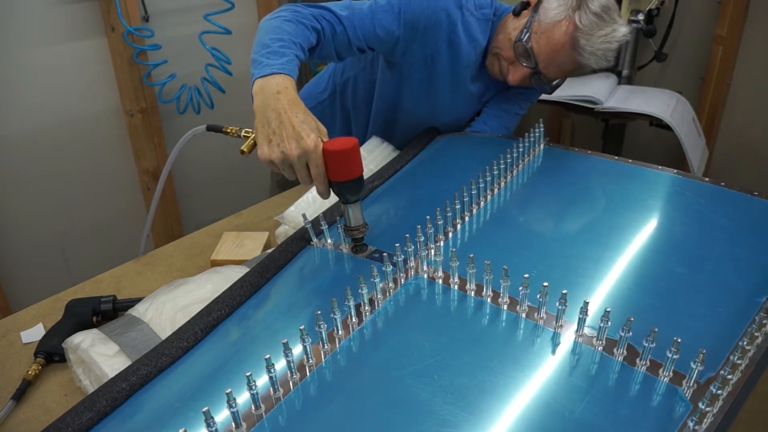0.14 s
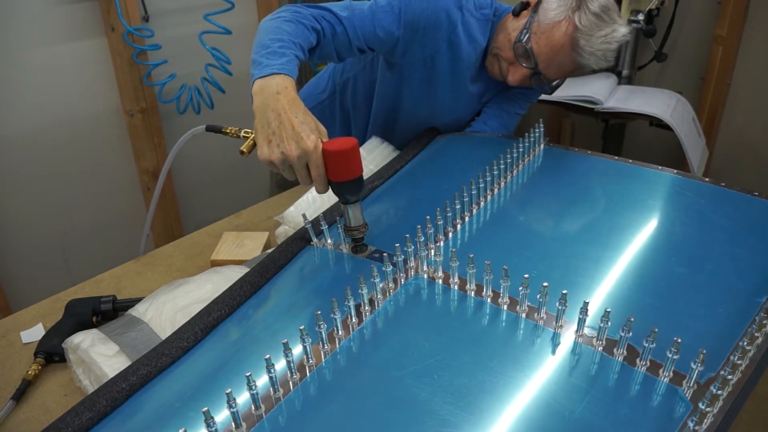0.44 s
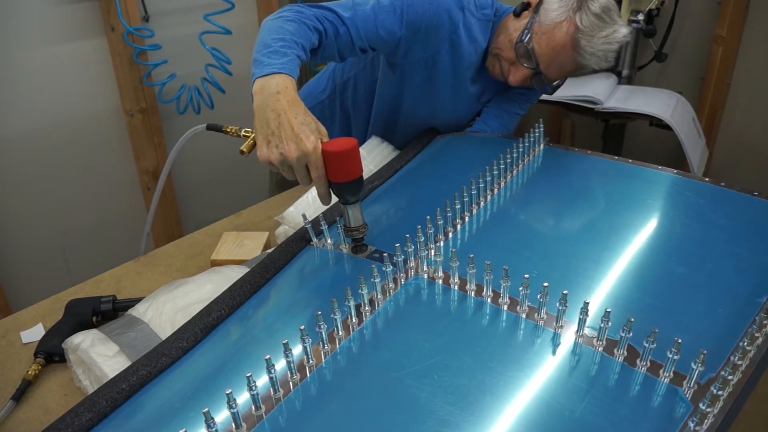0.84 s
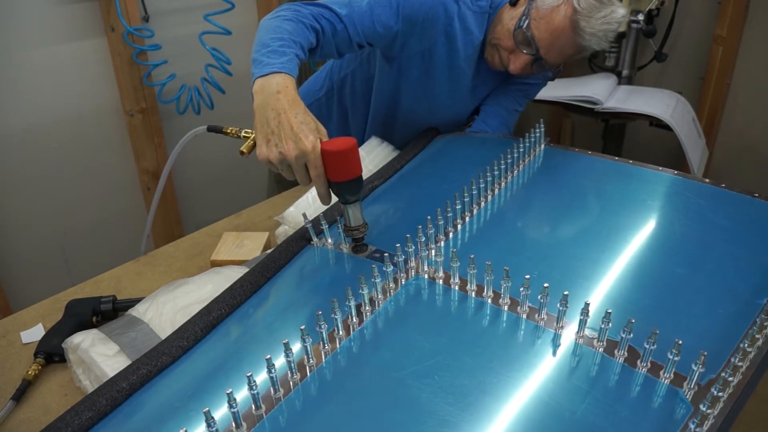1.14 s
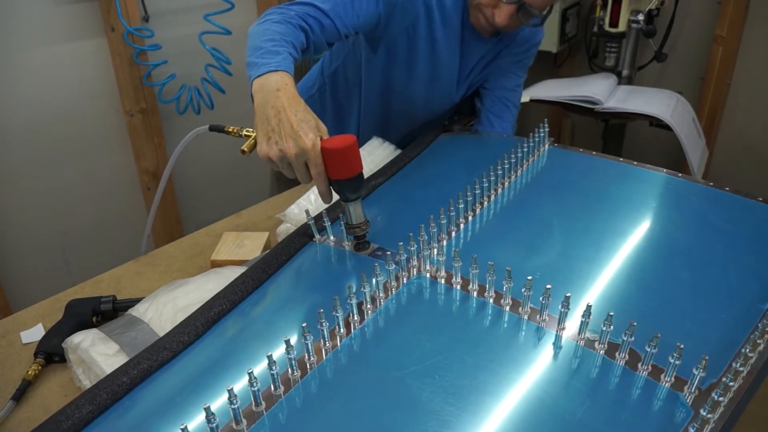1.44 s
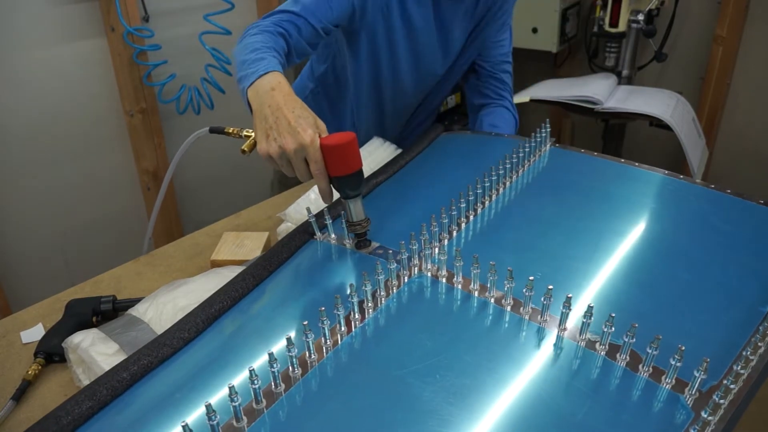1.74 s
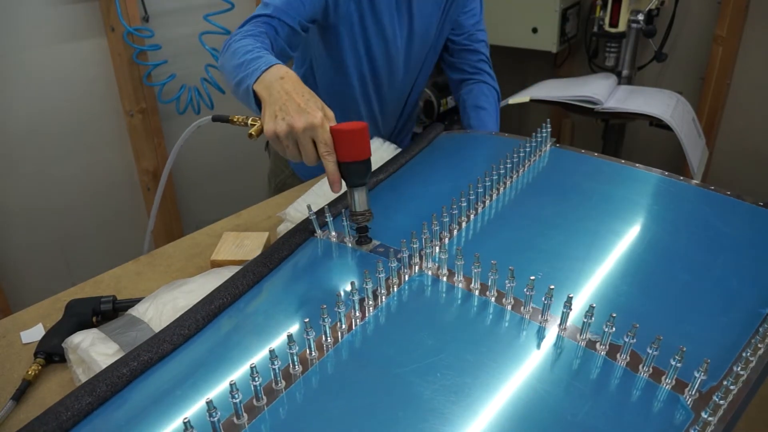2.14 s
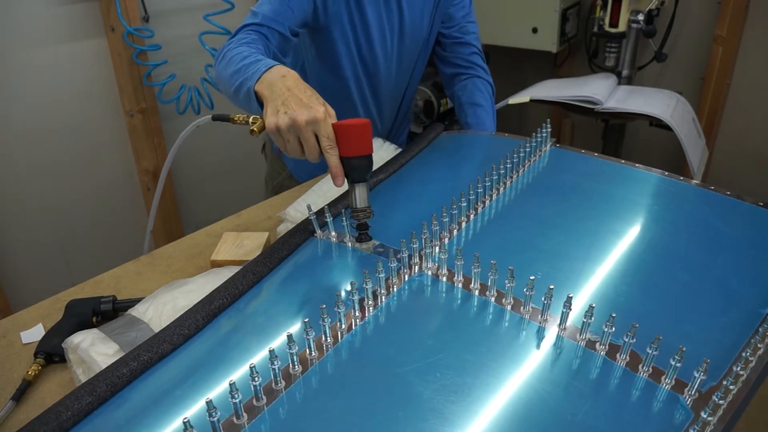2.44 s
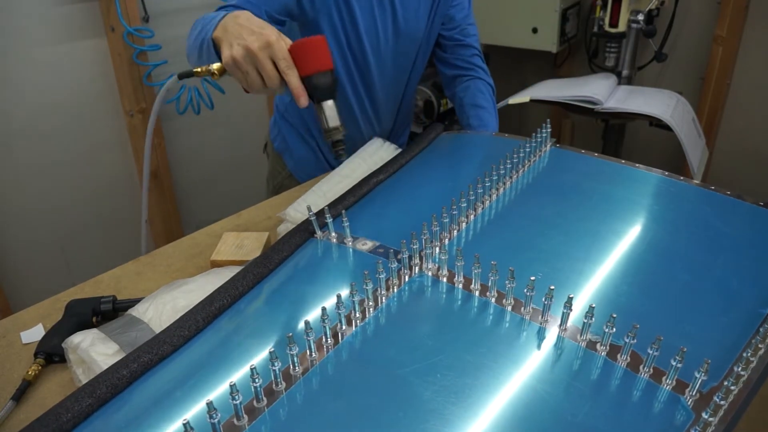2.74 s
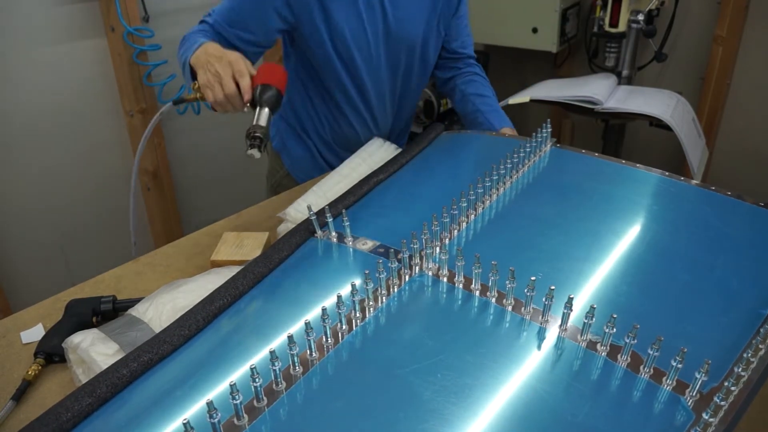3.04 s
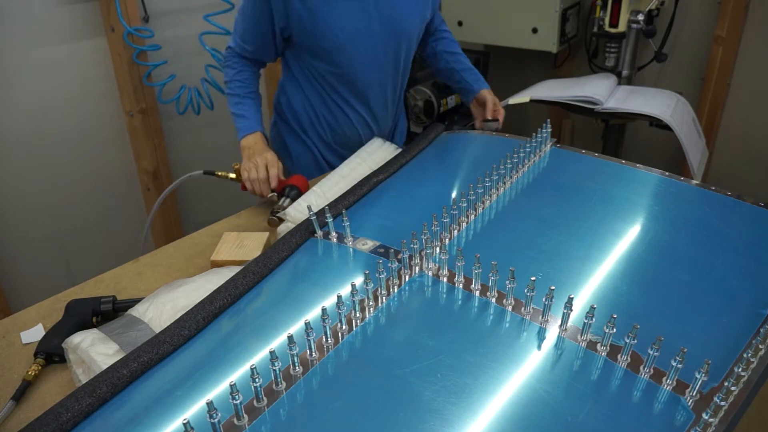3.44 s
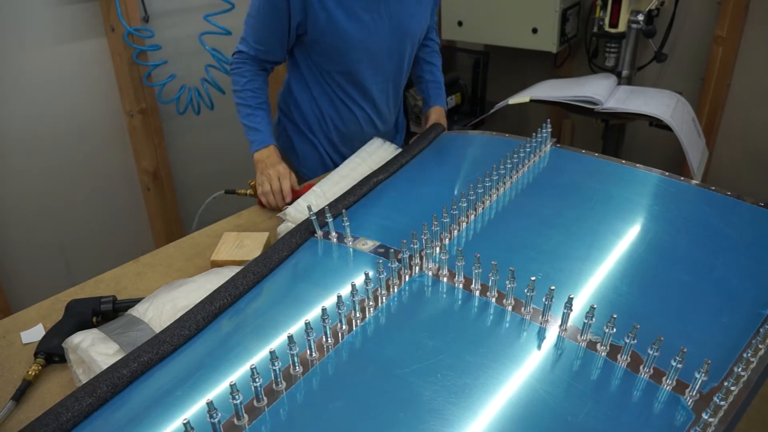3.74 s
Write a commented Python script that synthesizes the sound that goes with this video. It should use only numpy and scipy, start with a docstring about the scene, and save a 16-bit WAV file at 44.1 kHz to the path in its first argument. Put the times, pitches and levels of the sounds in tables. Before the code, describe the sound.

A pneumatic rivet gun dominates: over steady fan-like workshop rush, metal clicks at 0.4 s lead into a harsh, rattling burst on aluminium sheet from 0.5 to 0.75 s, about 38 blows per second, ringing briefly. The rush ducks, then creeps back. Cloth shuffles from 1.3 s; thin hiss around 2.2; clicks, thuds and air puffs at 2.4-2.6; bench knocks at 3.5 and 3.75-3.8.

```python
"""A steady room rush is heard first, then clicks and one hard burst of a pneumatic rivet gun on an aluminium panel.
A short, lighter clatter of clicks, knocks and thuds follows; afterwards the gun is knocked down on the bench.
Blows excite the panel's decaying modes, contacts are short coloured noise bursts, and valve air is shaped noise.
Soft shuffles swell and fade between. A gain control flattens the bursts and ducks the rush, which creeps back."""
import sys
import numpy as np
from scipy import signal
from scipy.fft import rfft, irfft
from scipy.io import wavfile
from scipy.ndimage import uniform_filter1d

SR = 44100
rng = np.random.default_rng(int(sys.argv[2]) if len(sys.argv) > 2 else 0)


def to_wav(sig):
    """Store sig (one row per channel, or 1-D mono) as 16-bit WAV at the path in sys.argv[1].

    Samples outside -1..1 are clipped; the rate is SR.
    """
    pcm = np.clip(np.atleast_2d(sig), -1, 1) * 32767
    pcm = np.round(pcm).astype(np.int16)
    wavfile.write(sys.argv[1], SR, pcm.T)  # frames by channels


N = 171990
TIME = np.arange(N) / SR  # the whole scene [s]
RING = np.arange(SR) / SR  # one second for each single event [s]


def amp(db):
    """Level law: decibels to an amplitude ratio."""
    return 10 ** (np.asarray(db) / 20)


def read(points, hz):
    """Interpolates a table linearly on a log-frequency axis, as pitch is heard."""
    f, value = np.transpose(points)
    return np.interp(np.log(hz + 1), np.log(f + 1), value)


def freqs(size):
    """The discrete Fourier frequencies [Hz] of a signal of this length."""
    return np.fft.rfftfreq(size, 1 / SR)


def add(mix, s, sound):
    """Superposition: adds a sound to the mix at time s."""
    start = max(round(s * SR), 0)
    part = mix[:, start:][:, :sound.shape[1]]
    part += sound[:, :part.shape[1]]


def noise(gain, size):
    """Filtered Gaussian noise, a mid and a side signal, each of unit RMS over the pair."""
    z = irfft(rfft(rng.standard_normal((2, size))) * gain, size)
    return z / np.sqrt(np.mean(z ** 2) + 1e-20)


def coloured(x, gain):
    """Minimum-phase filtering: a folded cepstrum gives a causal filter of unit power gain."""
    unit_gain = gain / np.sqrt(np.mean(gain ** 2))
    cepstrum = irfft(np.log(unit_gain + 1e-5), SR)
    cepstrum[1:SR // 2] *= 2
    cepstrum[SR // 2 + 1:] = 0
    return irfft(rfft(x) * np.exp(rfft(cepstrum)), SR)


def die_away(x, t60s):
    """Frequency-dependent damping: overlapping bands each decay by 60 dB in their own time."""
    hz, centres = freqs(SR), np.transpose(t60s)[0]
    spectrum = rfft(x)
    total = 0
    for share, (_, t60) in zip(np.eye(len(t60s)), t60s):
        band = irfft(spectrum * read(list(zip(centres, share)), hz), SR)
        total = total + band * np.exp(-np.log(1000) * RING / t60)
    return total


def hump(centre_hz, octaves):
    """A broad resonance, symmetrical on a log-frequency axis."""
    detuning = np.log2((freqs(SR) + 1) / centre_hz) / octaves
    return 1 / (1 + detuning ** 2 / 2) ** 2


def hit(gain, decay_s, room_db, snap=0):
    """Impact excitation: a decaying noise burst, an optional impulse and the workshop's reverberation."""
    # Reverberation: (frequency [Hz], 60 dB decay time [s])
    room_t60 = [(100, 0.13), (500, 0.46), (2500, .45), (6000, 0.35), (11000, 0.27)]
    burst = noise(1, SR) * np.exp(-RING / decay_s) + snap * (RING == 0)
    reverberation = amp(room_db) * die_away(noise(1, SR), room_t60)
    return coloured(burst + reverberation, gain)


def stereo(pair, side):
    """Mid-side decoding: sum and difference give left and right, with a balance set by frequency."""
    # Balance: (frequency [Hz], left minus right [dB])
    lean_points = [(60, 1), (110, -0.5), (190, -0.5), (350, 0), (630, 0.5), (1130, 3), (2020, 2.5),
                   (3640, 0.5), (6540, -0.5), (11800, 0.5)]
    hz = freqs(N)
    mid, wide = rfft(pair)
    wide = wide * amp(read(side, hz))
    lean = amp(read(lean_points, hz) / 2)
    return irfft(np.array([(mid + wide) * lean, (mid - wide) / lean]), N)


def room_rush():
    """Stationary broadband noise, as of a fan, with slow spectral flicker and narrow-band hum tones."""
    # Spectrum of the rush: (frequency [Hz], relative density [dB per Hz])
    rush_spectrum = [(15, -72), (25, -40), (54, -29), (96, -12.5), (152, -17), (182, -10), (281, -24.5),
                     (344, -4.5), (412, -6.5), (480, -1), (588, -4.5), (819, -6.5), (1000, -7.5),
                     (1230, -5), (1430, -11.5), (1630, -9.5), (2330, -13.5), (4400, -23.5), (11000, -42.5),
                     (14300, -86), (22000, -120)]
    # Wavering hum tones: (frequency [Hz], level [dB])
    hum_tones = [(101, -64), (182, -57.5), (479, -41.5), (684, -55.5), (802, -46.5), (861, -47.5),
                 (931, -48.5), (1206, -51.5)]
    rush_db, patchy_db, hum_width_hz = -33.5, 1.63, 12.3  # patchiness is a standard deviation
    hz = freqs(N)
    steady = noise(amp(read(rush_spectrum, hz)), N)
    z = signal.stft(steady, nperseg=1024, noverlap=768)[2]
    # Random gains smoothed over frequency, then over time
    patches = rng.standard_normal(z.shape[1:])
    patches = uniform_filter1d(patches, size=12, axis=0, mode="wrap")
    patches = uniform_filter1d(patches, size=12, axis=1)
    patchy = z * amp(patchy_db * patches / patches.std())
    rush = signal.istft(patchy, nperseg=1024, noverlap=768)[1][:, :N]
    hum = sum(amp(db) * noise(1 / (1 + (2 * (hz - f) / hum_width_hz) ** 2), N) for f, db in hum_tones)
    return amp(rush_db) * rush + hum


def shuffles():
    """Friction noise as the worker straightens up: exponential swells and decays shape one rubbing noise."""
    # Swells: (peak time [s], level [dB], rise time constant [s], fall time constant [s])
    swells = [(1.312, -26, 0.017, 0.15), (1.62, -36, 0.037, 0.041), (1.84, -31.5, 0.035, 0.055),
              (1.924, -27, .025, 0.075), (2.2, -34.5, 0.22, .12), (2.76, -33, 0.032, 0.056),
              (2.874, -36, 0.03, 0.028), (2.94, -33, 0.038, 0.032), (3.66, -44, 0.053, 0.15)]
    # Spectrum of the rubbing: (frequency [Hz], relative density [dB per Hz])
    rubbing = [(59, -50), (100, -15), (543, 5), (870, -1), (1080, -2), (1910, -5), (2670, -15.5),
               (4200, -14.5), (11000, -32), (14300, -65), (22000, -120)]
    level = 0
    for s, db, rise, fall in swells:
        level = level + amp(db) * np.exp(-np.maximum((s - TIME) / rise, (TIME - s) / fall))
    return level * noise(amp(read(rubbing, freqs(N))), N)


def leak():
    """Turbulent seepage past the trigger: a thin high hiss, its level modulated by slow noise."""
    # Level of the seeping air: (time [s], level [dB])
    seepage = [(1.85, -62), (2.0, -49), (2.22, -37), (2.34, -43), (2.4, -43), (2.43, -57)]
    leak_hz, leak_octaves, sputter_db, sputter_hz = 10380, 0.76, 3, 39
    sputter = noise(1 / (1 + (freqs(N) / sputter_hz) ** 4), N)[0]
    level_db = np.interp(TIME, *np.transpose(seepage), left=-np.inf, right=-np.inf)
    colour = np.interp(freqs(N), freqs(SR), hump(leak_hz, leak_octaves))
    return amp(level_db + sputter_db * sputter) * noise(colour, N)


def air():
    """Jet noise: air let out by the valve hisses, and resonances of the exhaust port add two fuzzy whistles."""
    # Puffs: (start [s], length before the fall [s], level [dB], whistle relative to hiss [dB])
    puffs = [(0.426, 0.062, -51, -21), (2.429, 0.07, -17, -18), (2.52, 0.064, -26, 3.5)]
    # Spectrum of the hiss: (frequency [Hz], relative density [dB per Hz])
    hiss_spectrum = [(300, -26), (1000, 11), (3000, 4.5), (6000, 1.5), (8000, -17.5), (11000, 8.5)]
    # Port resonances: (frequency [Hz], width [Hz], relative level [dB])
    whistles = [(6330, 750, -1.5), (9840, 400, -0.5)]
    rise_s, fall_s = 0.0025, 0.038  # linear rise, exponential fall
    out, hz = np.zeros((2, N)), freqs(SR)
    port = sum(amp(db) / (1 + (2 * (hz - f) / width) ** 2) for f, width, db in whistles)
    for s, length, db, whistle_db in puffs:
        flow = np.minimum(RING / rise_s, 1) * np.exp(-np.maximum(RING - length, 0) / fall_s)
        hiss = noise(amp(read(hiss_spectrum, hz)), SR)
        whistle = amp(whistle_db) * noise(port, SR)
        add(out, s, amp(db) * flow * (hiss + whistle))
    return out


def clicks():
    """Light metal impacts of valve, piston and rivet set: very short contact excites a wide band."""
    # Clicks: (time [s], level [dB], centre [Hz], width [octaves])
    metal_clicks = [(0.4217, -14, 6700, 1.6), (0.4258, -19, 7950, .7), (.4425, -29, 5100, 0.65),
                    (0.4706, -18, 5500, .9), (0.4748, -6.5, 3310, 0.18), (0.479, -10, 3500, 1.3),
                    (0.4877, -10.5, 1650, 1.0), (0.4974, -3, 3410, 1.6), (0.917, -20.5, 4500, 1.1),
                    (2.088, -32, 9000, 0.5), (2.222, -56, 9000, .6), (2.293, -22, 8500, 1.2),
                    (2.413, -18.5, 9000, 1.6), (2.422, -9, 6100, 0.59), (2.4296, -9, 7150, 0.86),
                    (2.44, -12, 7550, 0.69), (2.4734, -8.5, 3900, 0.77), (2.4826, -2.5, 3000, 1.6),
                    (2.5, -3.5, 1360, 1.7), (2.5092, -12, 1290, 1.8), (2.5168, -6, 8500, 1.5),
                    (2.583, -14.5, 4220, 0.25), (3.513, -22.5, 2300, 0.49), (3.7495, -20, 1070, 1.3),
                    (3.8257, -25, 1200, 0.95)]
    decay_s, room_db, snap_db = 0.0024, -11, 10
    out = np.zeros((2, N))
    for s, db, centre, octaves in metal_clicks:
        add(out, s, amp(db) * hit(hump(centre, octaves), decay_s, room_db, amp(snap_db)))
    return out


def knocks():
    """Body impacts of the gun on panel and bench: one shared spectrum, tilted brighter or duller."""
    # Knocks: (time [s], level [dB], spectral tilt [dB per octave])
    body_knocks = [(.4225, -40, -2.5), (2.423, -17, 4), (2.486, -10, 3.5), (3.513, -18, -0.5),
                   (3.7247, -20, 3), (3.7315, -19, -2), (3.825, -27, 1.5)]
    # Spectrum before the tilt: (frequency [Hz], relative density [dB per Hz])
    knock_spectrum = [(35, -44), (60, -22), (329, 1.5), (957, -1), (1110, -3.5), (1610, -5), (2050, -15),
                      (2290, -11.5), (2970, -21), (4800, -18.5), (11000, -42.5), (14300, -71),
                      (22000, -120)]
    decay_s, room_db = 0.014, -5.5
    out, hz = np.zeros((2, N)), freqs(SR)
    for s, db, tilt in body_knocks:
        gain = amp(read(knock_spectrum, hz) + tilt * np.log2(hz + 1))
        add(out, s, amp(db) * hit(gain, decay_s, room_db))
    return out


def thuds():
    """Dull impacts of the gun on panel and bench: one low resonance colours each short burst."""
    # Thuds: (time [s], level [dB], centre [Hz])
    dull_thuds = [(.418, -28.5, 369), (0.47, -13.5, 503), (0.496, -6.5, 430), (2.424, -16, 513),
                  (2.485, -13.5, 497), (2.501, -16.5, 620), (2.507, -15, 880), (2.512, -17, 550),
                  (3.513, -44, 138), (3.749, -18, 407), (3.756, -34, 140), (3.767, -17.5, 344)]
    width_octaves, decay_s, room_db = 0.44, 0.007, -6.5
    out = np.zeros((2, N))
    for s, db, centre in dull_thuds:
        add(out, s, amp(db) * hit(hump(centre, width_octaves), decay_s, room_db))
    return out


def hammering():
    """Modal excitation: each blow adds a crack, the same panel ring, modes and a fresh rattle; they pile up."""
    # Hammer blows, the last ones weakening: (time [s], level [dB])
    blows = [(0.5074, -1.5), (0.5342, -7), (0.5582, -3), (0.5845, 1), (0.6098, 0), (0.6355, 2), (.665, 0),
             (0.7025, -6.5), (0.7287, -11), (0.754, -40)]
    # Panel response: (frequency [Hz], relative density [dB per Hz])
    panel = [(24, -87), (40, -36), (222, -15.5), (356, 1.5), (543, 2), (611, 2.5), (890, -1), (1000, 0),
             (1330, -1), (1680, -3), (2070, -3.5), (2560, -3), (2880, -4.5), (4400, -0.5), (11000, -10.5),
             (14300, -55), (22000, -120)]
    # Panel damping: (frequency [Hz], 60 dB decay time [s])
    panel_t60 = [(150, 0.55), (500, 0.34), (2200, 0.53), (4500, 0.41), (7000, 0.32), (11000, 0.28)]
    # Panel modes: (frequency [Hz], relative level before the panel response [dB])
    panel_modes = [(939, 1), (1013, -2), (1275, -3), (1393, 1), (1552, 1), (1652, -1), (1730, 1), (1865, 0),
                   (2132, 3), (2204, 2), (2517, 2), (3144, 2), (4263, -2), (5411, -3)]
    modes_db, mode_t60_s, rattle_db = -15, 0.32, -2.5
    crack_db, crack_s, crack_hz, crack_octaves = -6.5, 0.0077, 9000, 0.73
    out = np.zeros((2, N))
    colour = amp(read(panel, freqs(SR)))
    ring = die_away(noise(1, SR), panel_t60)
    fade = np.exp(-np.log(1000) * RING / mode_t60_s)
    crack_burst = noise(1, SR) * np.exp(-RING / crack_s)
    crack = amp(crack_db) * coloured(crack_burst, hump(crack_hz, crack_octaves))
    for s, db in blows:
        modes = 0
        for hz, level in panel_modes:
            phase = rng.random((2, 1))  # in cycles, separate for mid and side
            modes = modes + amp(modes_db + level) * np.sin(2 * np.pi * (hz * RING + phase))
        rattle = amp(rattle_db) * die_away(noise(1, SR), panel_t60)
        add(out, s, amp(db) * (crack + coloured(ring + rattle + fade * modes, colour)))
    return out


def scene():
    """Superposition of two stereo fields: the gun close by and the room around it."""
    # Stereo width of gun and room: (frequency [Hz], side minus mid [dB])
    tool_side = [(60, -15), (110, -23), (190, -12), (350, -18), (630, -14), (1130, -9.5), (2020, -9.5),
                 (3640, -6), (6540, -25), (11800, -27)]
    room_side = [(60, -16), (110, -38), (190, -22), (350, -22.5), (630, -14.5), (1130, -10), (2020, -5),
                 (3640, -7), (6540, -12), (11800, -41)]
    room = room_rush() + shuffles()
    gun = leak() + air() + clicks() + knocks() + thuds() + hammering()
    return stereo(room, room_side) + stereo(gun, tool_side)


def held(db, db_per_s):
    """Peak holding: follows rises at once and falls back at a fixed speed."""
    fall = TIME * db_per_s
    return np.maximum.accumulate(db + fall) - fall


def record(dry):
    """Dynamic range compression with a quick and a slow recovery, then low-pass filtering."""
    limit_db, quick_db_per_s = -16.5, 73
    slow_share, slow_db_per_s = 0.6, 2.5
    edge_hz = 11150
    power = uniform_filter1d((dry ** 2).mean(0), size=260)  # about 6 ms
    power_db = 10 * np.log10(abs(power) + 1e-12)
    over_db = np.maximum(power_db - limit_db, 0)
    quick_db = held(over_db, quick_db_per_s)
    slow_db = held(slow_share * over_db, slow_db_per_s)
    duck_db = np.maximum(quick_db, slow_db)
    ducked = dry / amp(uniform_filter1d(duck_db, size=60))
    low_pass = signal.firwin(511, edge_hz, window=("kaiser", 8), fs=SR)
    return signal.oaconvolve(ducked, low_pass[None], "same")


dry = scene()
out = record(dry)
to_wav(out)
```